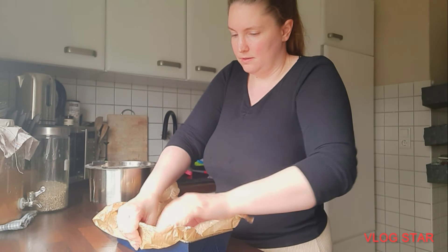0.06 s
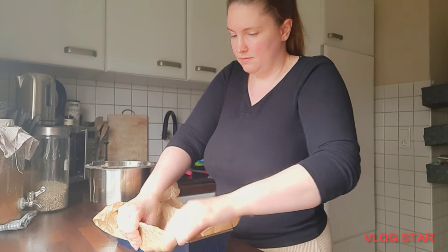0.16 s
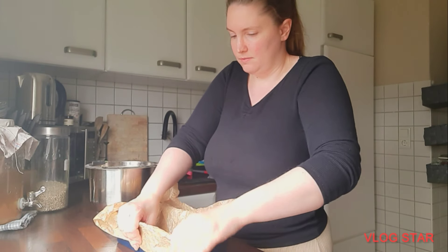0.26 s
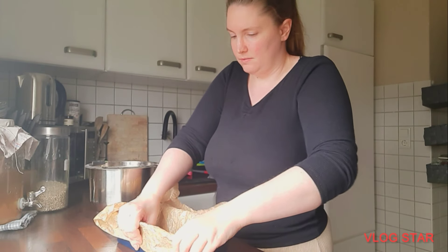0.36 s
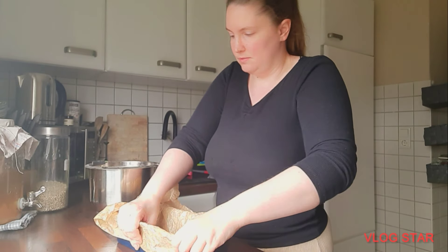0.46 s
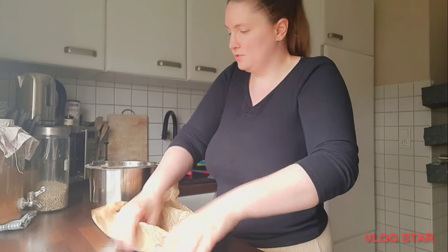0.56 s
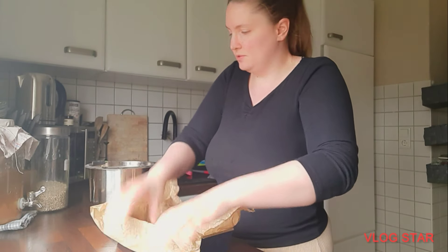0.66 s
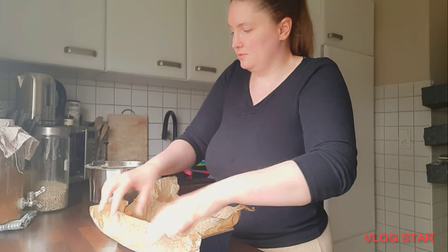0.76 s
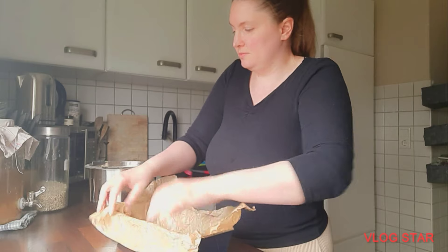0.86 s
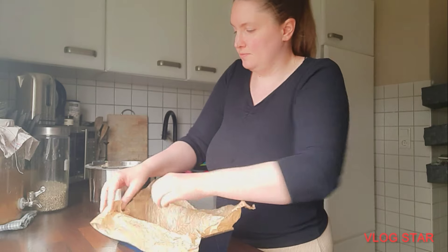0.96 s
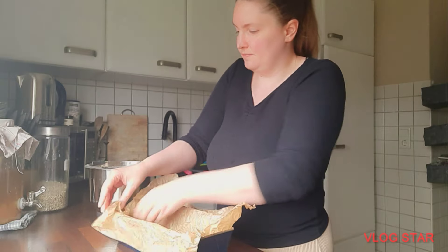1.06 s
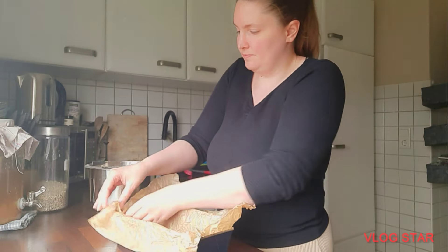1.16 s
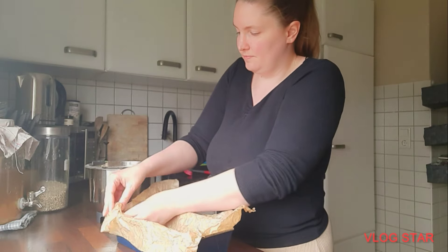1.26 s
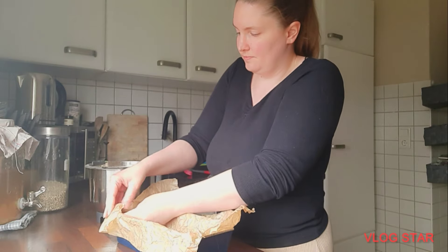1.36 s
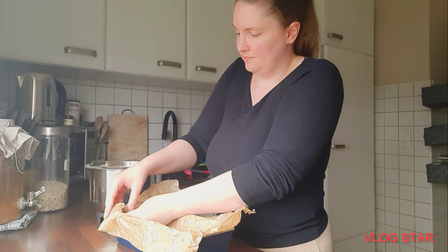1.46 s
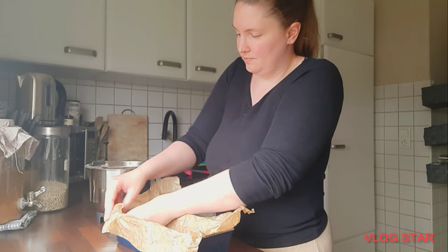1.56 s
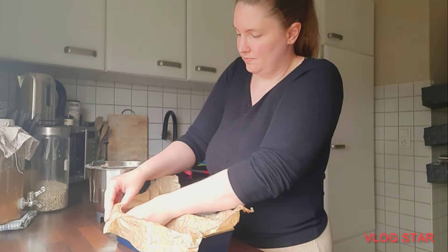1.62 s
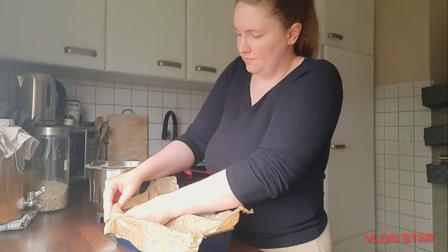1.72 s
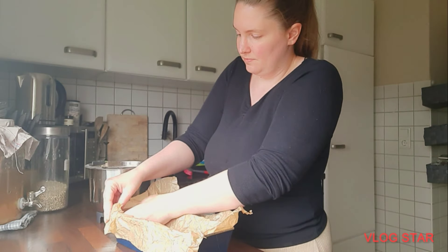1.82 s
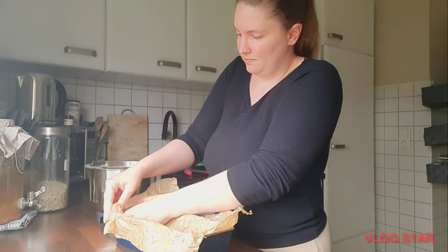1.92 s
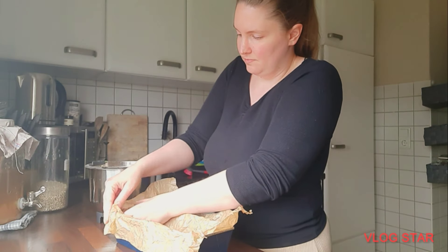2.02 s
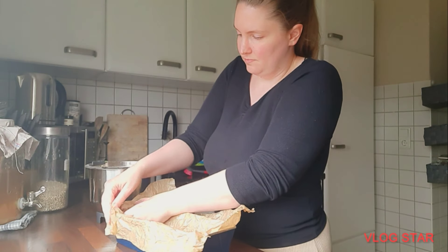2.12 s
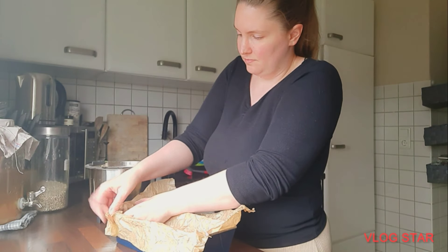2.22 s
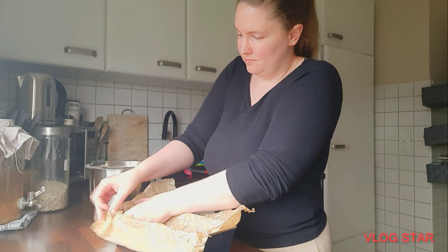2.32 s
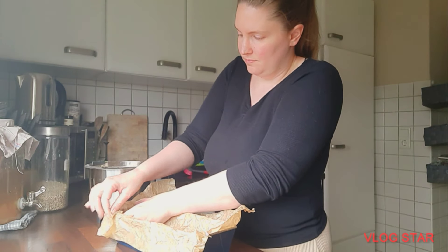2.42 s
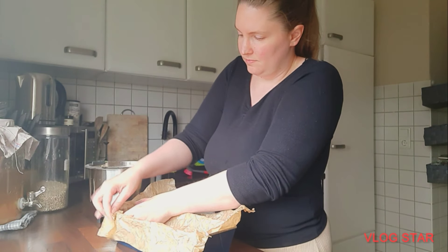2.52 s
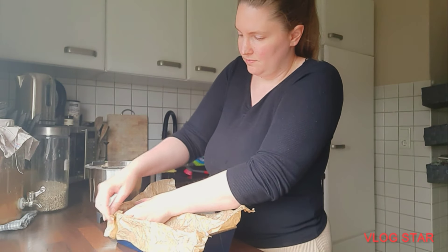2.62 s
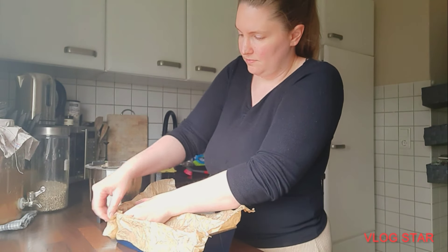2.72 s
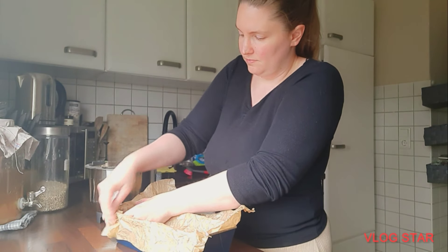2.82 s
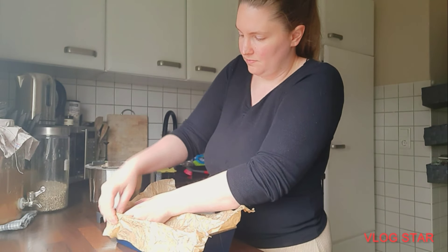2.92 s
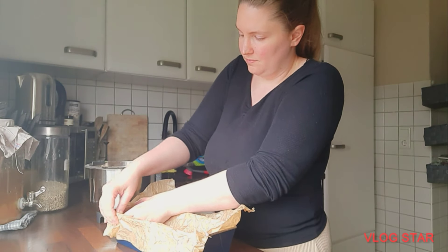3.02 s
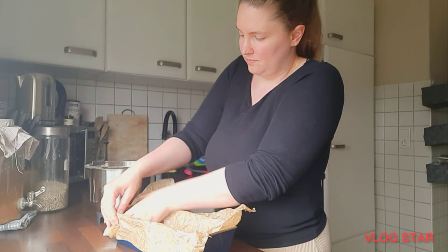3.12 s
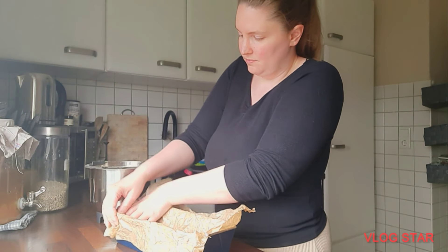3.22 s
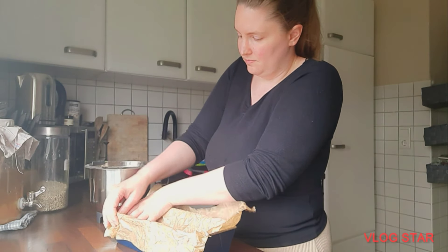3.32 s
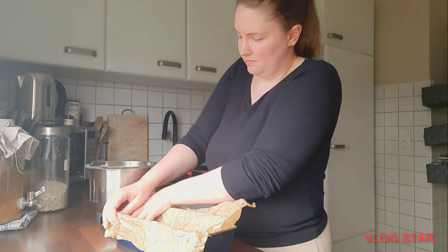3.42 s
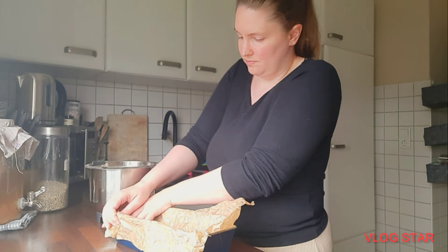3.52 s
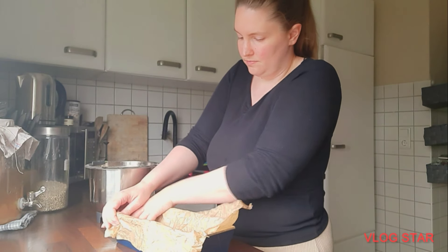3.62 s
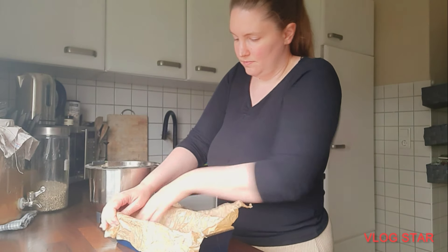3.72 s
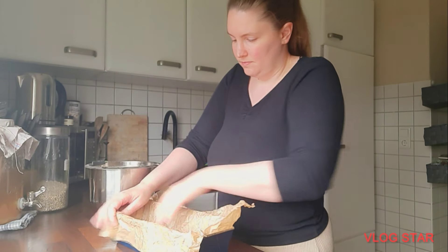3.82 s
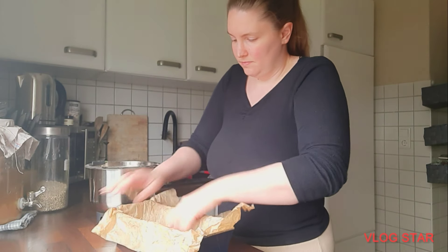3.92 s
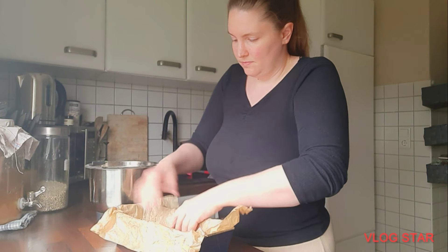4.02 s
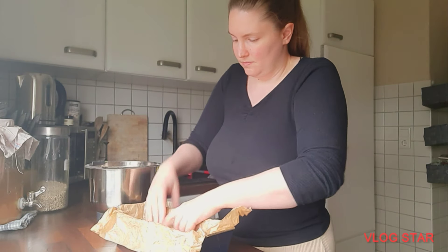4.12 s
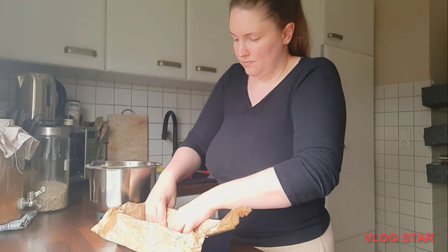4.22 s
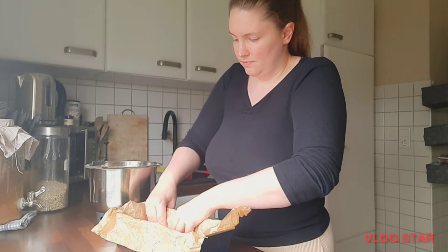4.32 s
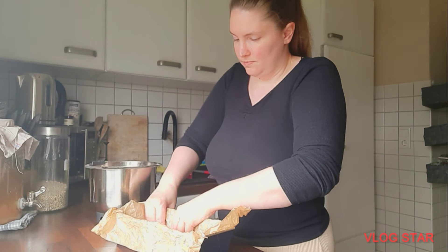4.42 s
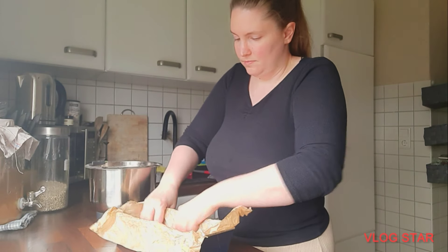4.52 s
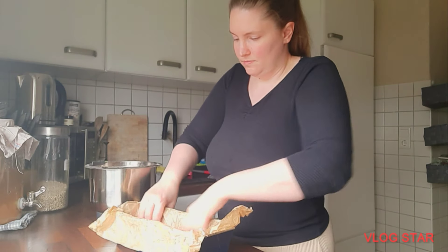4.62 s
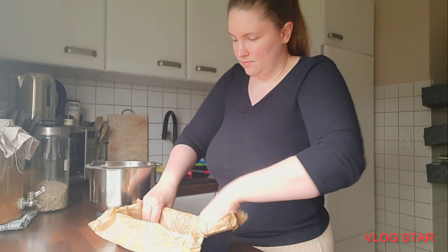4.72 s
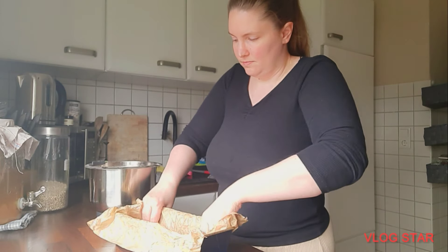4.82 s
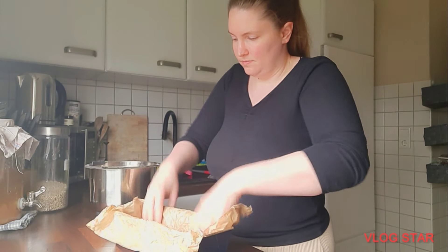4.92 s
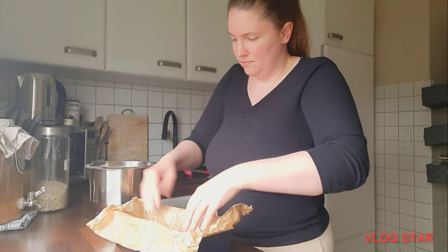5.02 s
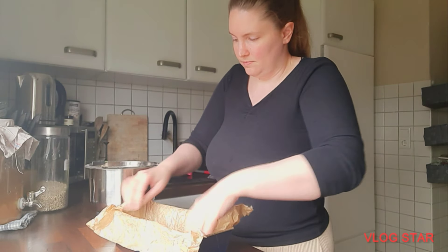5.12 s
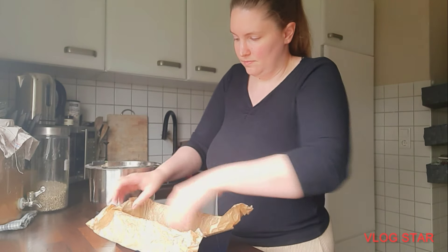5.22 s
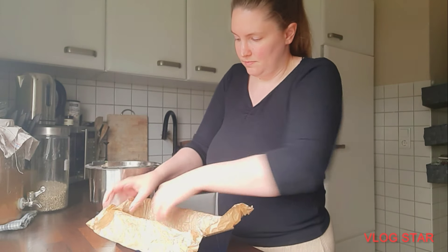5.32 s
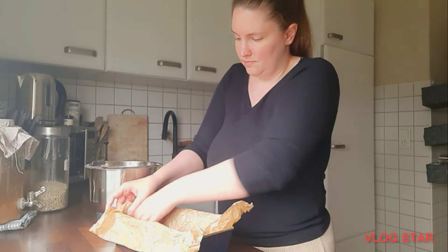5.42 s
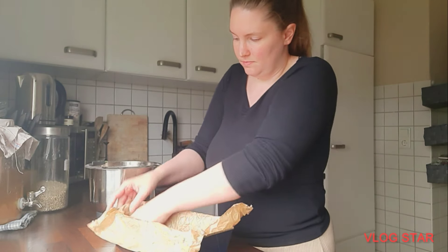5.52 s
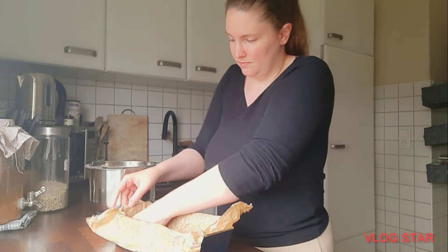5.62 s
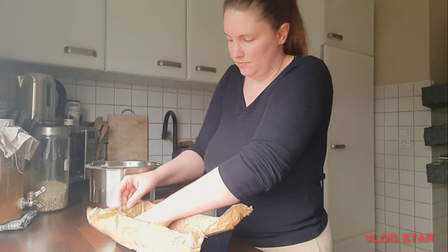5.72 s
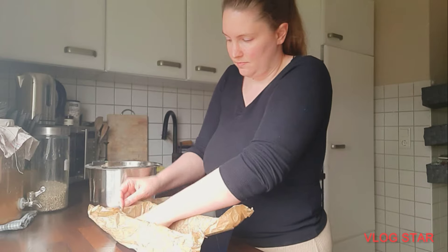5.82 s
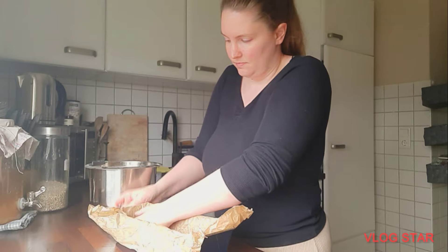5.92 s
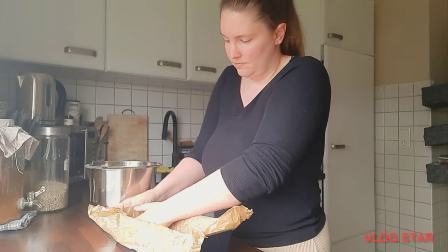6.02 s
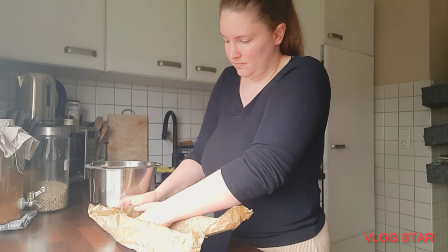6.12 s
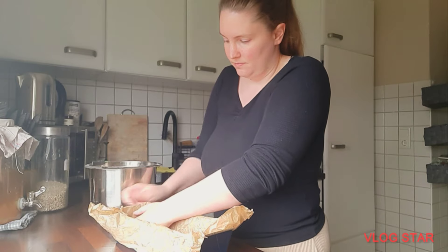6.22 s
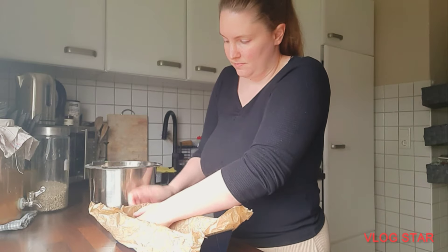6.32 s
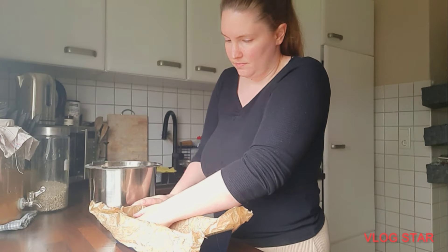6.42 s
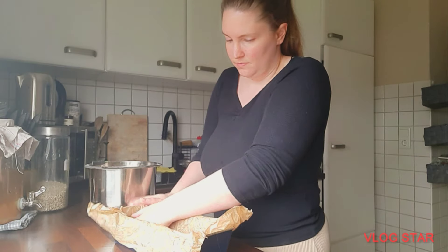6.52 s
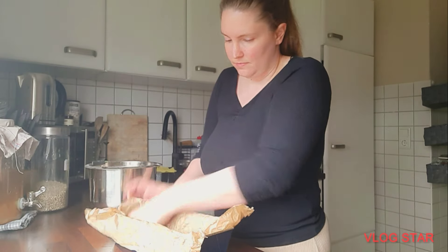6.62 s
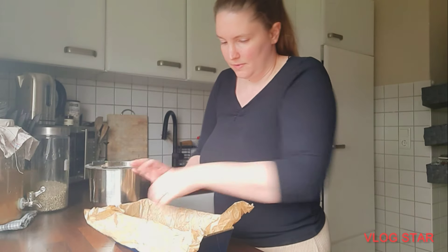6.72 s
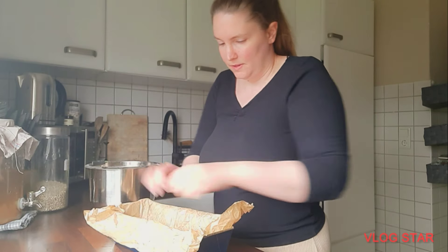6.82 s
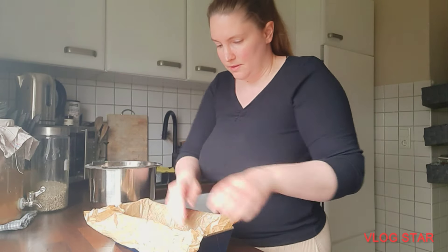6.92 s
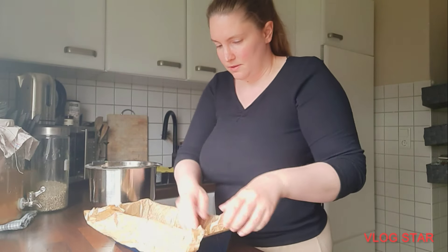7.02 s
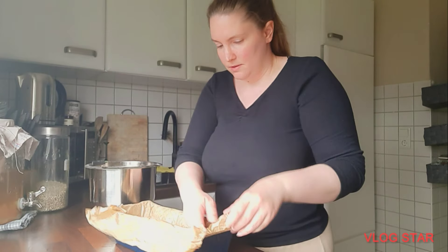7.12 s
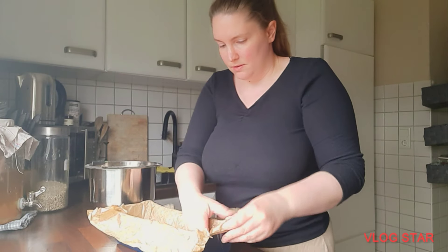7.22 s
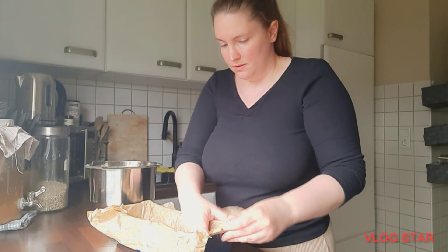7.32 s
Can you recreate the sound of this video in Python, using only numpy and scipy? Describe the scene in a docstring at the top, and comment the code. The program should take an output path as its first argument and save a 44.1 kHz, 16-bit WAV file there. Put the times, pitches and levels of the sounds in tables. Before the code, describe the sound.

Hands push and fold stiff baking paper into a loaf tin on a kitchen counter. Short bursts of bright crinkling come in uneven strokes, with sharp creases snapping, hollow panel pops and dull tin bumps. The strongest crunch comes past the middle, then shorter strokes follow to the end. Close stereo microphone, slightly stronger to the right, small tiled room echo, faint air and low hum.

```python
"""Faint air and a low hum come first, with the light rustle of hands already resting on baking paper.
Two hands press the sheet into a loaf tin on a kitchen counter, close to a two-port microphone.
Strokes are swarms of tiny noise bursts: flexing, rubbing and crinkling; creases snap and panels pop.
Fingers drag along the tin and bump it, stirring its resonances; a small tiled kitchen echoes the paper and tin."""
import sys
import numpy as np
from scipy import signal
from scipy.fft import rfft, irfft, next_fast_len
from scipy.io import wavfile
from scipy.ndimage import map_coordinates

SR = 44100
rng = np.random.default_rng(int(sys.argv[2]) if len(sys.argv) > 2 else 0)


def put_to_file(sound):
    """Save the sound as 16-bit audio at rate SR, in the file named by the first command-line argument."""
    columns = np.atleast_2d(sound).T  # one column per channel
    safe = np.clip(columns, -1, 1)
    whole_steps = np.round(safe * 32767)
    wavfile.write(sys.argv[1], SR, whole_steps.astype(np.int16))


N = 324576  # length in samples
TOP_HZ = 15950  # band limit of the microphone


def amp(db):
    """Amplitude factor of a level in dB."""
    return 10 ** (np.asarray(db) / 20)


def unit(x):
    """Scale a signal to rms 1."""
    return x / np.sqrt(np.mean(x ** 2) + 1e-20)


def along(points, hz):
    """Read a (f/Hz, value) table at any frequency, on a log axis."""
    f, value = np.transpose(points)
    return np.interp(np.log(hz + 1), np.log(f + 1), value)


def wobble(rate):
    """A smooth random curve with rate knots a second."""
    knots = rng.standard_normal(int(N * rate / SR) + 4)
    return map_coordinates(knots, [np.arange(N) * rate / SR])


def add(track, s, sound):
    """Mix a sound into a track at time s."""
    start = max(round(s * SR), 0)
    part = track[..., start:start + sound.shape[-1]]
    part += sound[..., :part.shape[-1]]


def filtered(x, response):
    """Multiply the spectrum of x by a complex response of frequency."""
    n = x.shape[-1]
    padded = 2 * next_fast_len(n * 5 // 8)
    spectrum = rfft(x, padded) * response(np.fft.rfftfreq(padded, 1 / SR))
    return irfft(spectrum, padded)[..., :n]


def coloured(x, points):
    """Causal (minimum-phase) filter with the gains of a (f/Hz, level/dB) table."""
    def response(hz):
        cepstrum = irfft(np.log(amp(along(points, hz))))
        # folding the cepstrum onto positive time makes the filter causal
        cepstrum[1:len(hz) - 1] *= 2
        cepstrum[len(hz):] = 0
        return np.exp(rfft(cepstrum))
    return filtered(x, response)


def resonance(f, centre, width):
    """Response of one damped mode."""
    return 1j * f * width / (centre ** 2 - f * f + 1j * f * width)


# How alike the two microphone ports hear a spread source: f/Hz, likeness (0 to 1)
PORT_LIKENESS = [(100, 0.91), (250, 0.92), (500, 0.56), (1000, 0.23), (4000, 0.26), (12000, 0.05)]


def spread(pair):
    """Two unrelated signals become left and right, alike in the bass and wide in the treble."""
    def mid_side_gains(hz):
        turn = np.arccos(np.clip(along(PORT_LIKENESS, hz), -1, 1)) / 2
        return np.array([np.cos(turn), np.sin(turn)])
    mid, side = filtered(pair, mid_side_gains)
    return np.array([mid + side, mid - side])


# Spectrum of the still kitchen air: f/Hz, relative level/dB
AIR_COLOUR = [(20, -30), (50, -9.5), (100, -4.5), (400, -15.5), (1000, -27), (4000, -21.5), (15000, -28)]
HUM_HZ = 69.7


def background():
    """Still air is coloured noise; a low appliance hum is a sine with a slowly wandering phase."""
    air = unit(coloured(spread(rng.standard_normal((2, N))), AIR_COLOUR))
    hum_phase = 2 * np.pi * HUM_HZ * np.arange(N) / SR + 0.5 * wobble(3.5)
    return amp(-67.5) * air + amp(-75.0) * np.sin(hum_phase)


RELEASE_DB_PER_S = 174  # the paper settles once the fingers stop
CREST = 0.64  # share of a movement's length at which its arch turns


def gesture(start, length, attack_s, swell_db):
    """Gain of one hand movement: the grip, an arch of pressure in dB, then a steady fall."""
    t = np.arange(N) / SR - start
    grip = np.clip(t / attack_s, 0, 1)
    progress = np.clip(t / length, 0, 1)
    arch_db = -swell_db * (1 - progress / CREST) ** 2
    fall_db = RELEASE_DB_PER_S * np.maximum(t - length, 0)
    return grip * amp(arch_db - fall_db)


# Hands resting and shifting on the sheet: start t/s, length/s, relative level/dB
RESTING_HANDS = [(-0.04, 0.76, -53), (0.82, 1.9, -50), (2.54, 0.093, -54.5), (2.82, 0.59, -49),
                 (3.124, 1.92, -48.5), (5.404, 1.24, -46), (7.034, 0.26, -49)]
# Pushes, folds and tucks: start t/s, length/s, then relative level/dB of flexing, rubbing, crinkling
HAND_STROKES = [(0.048, 0.16, -49.5, -47, -41.5), (0.173, 0.25, -43.5, -38.5, -33.5),
                (0.579, 0.064, -46.5, -40.5, -42.5), (0.823, 0.036, -50, -38, -37),
                (0.857, 0.13, -45, -47.5, -59), (1.194, 0.22, -45, -43.5, -37),
                (1.536, 0.16, -38, -38.5, -36), (1.782, 0.09, -39, -41, -35),
                (1.863, 0.1, -39.5, -37.5, -33), (2.034, 0.19, -47, -41.5, -38.5),
                (2.315, 0.03, -43.5, -50, -35), (2.367, 0.036, -46.5, -40.5, -34.5),
                (2.546, 0.11, -65, -43.5, -44.5), (2.733, 0.05, -64, -47.5, -37.5),
                (2.785, 0.066, -56, -42.5, -38.5), (2.968, 0.048, -43, -39, -34),
                (3.207, 0.11, -43, -40.5, -37.5), (3.303, 0.38, -52, -42.5, -39.5),
                (3.636, 0.057, -42.5, -40, -43), (4.005, 0.14, -53, -44, -47.5),
                (4.175, 0.22, -42, -35.5, -33.5), (4.455, 0.16, -42, -38.5, -37),
                (4.68, 0.13, -34.5, -29.5, -26.5), (4.901, 0.085, -45.5, -39, -35.5),
                (5.127, 0.092, -42.5, -39, -38), (5.386, 0.043, -56, -51.5, -52),
                (5.494, 0.11, -42.5, -37.5, -37), (5.683, 0.072, -43, -38, -35),
                (5.899, 0.083, -40, -37, -34), (6.315, 0.053, -54, -40.5, -51),
                (6.36, 0.12, -41, -38, -34.5), (6.569, 0.14, -44, -41, -39), (7.081, 0.28, -44, -35.5, -36)]
STROKE_ATTACK_S, STROKE_SWELL_DB = 0.0046, 11  # the fingers take hold fast, then press harder
TOUCH_ATTACK_S = 0.034  # resting hands land gently
TOUCH_FLEX_DB, TOUCH_RUB_DB = -7, -2  # against the crinkling of a resting hand


def handling():
    """Strengths of flexing, rubbing and crinkling: strokes and resting hands, added in power."""
    power = np.zeros((3, N))
    for s, length, *levels_db in HAND_STROKES:
        stroke = gesture(s, length, STROKE_ATTACK_S, STROKE_SWELL_DB)
        power += np.outer(amp(levels_db), stroke) ** 2
    for s, length, db in RESTING_HANDS:
        levels_db = [db + TOUCH_FLEX_DB, db + TOUCH_RUB_DB, db]
        power += np.outer(amp(levels_db), gesture(s, length, TOUCH_ATTACK_S, 0)) ** 2
    return np.sqrt(power)


def patches(pair, patchy_db):
    """Every fold rings at its own pitches, so the colour keeps changing."""
    z = signal.stft(pair, nperseg=512)[2]
    blur = np.outer(np.hanning(8), np.hanning(9))  # over frequency and time
    field = signal.convolve2d(rng.standard_normal(z.shape[1:]), blur, "same")
    return signal.istft(z * amp(patchy_db * unit(field)), nperseg=512)[1][:, :N]


def swarm(colour, rate, t60, scatter_db, clump_db, patchy_db):
    """Facets buckle at random, in small avalanches, each a short dying noise burst; rms 1."""
    scatter = scatter_db * np.clip(rng.standard_normal(N), -2, 2)
    size = amp(scatter + clump_db * wobble(50))
    flips = (rng.random(N) < rate / SR) * size
    decay = amp(-60 / (t60 * SR)) ** 2  # energy kept from sample to sample
    energy = signal.lfilter([1], [1, -decay], flips ** 2)
    bursts = np.sqrt(energy) * patches(rng.standard_normal((2, N)), patchy_db)
    return unit(coloured(spread(bursts), colour))


# Spectrum of fine wrinkles: f/Hz, relative level/dB
CRINKLE_COLOUR = [(1000, -44.5), (3000, -5), (5000, -3.5), (7000, -2.5), (8700, -3), (9900, -7),
                  (11200, -3), (13200, -4), (15800, -9.5)]


def crackles(rate=200, centre_hz=5800, pitch_spread=0.47, loss_db=5.0, scatter_db=5.0, wander_s=0.0001457):
    """Single wrinkles flip, each a tick at its own pitch and place that loses loss_db a cycle; rms 1."""
    t = np.arange(SR // 200) / SR
    starts = np.flatnonzero(rng.random(N - len(t)) < rate / SR)
    traits = rng.standard_normal((N, 4))[starts].T.clip(-2, 2)
    pitch, size, place, lean = traits[:, :, None]
    hz = np.minimum(centre_hz * np.exp(pitch_spread * pitch), TOP_HZ)
    samples = (starts[:, None] + np.arange(len(t))).ravel()
    out = []
    for side in 1, -1:  # left, right
        arrival_s = wander_s * (2 + side * place)
        cycles = hz * np.maximum(t - arrival_s, 0)
        level_db = scatter_db * size + 2 * side * lean - loss_db * cycles
        ticks = amp(level_db) * np.sin(2 * np.pi * cycles)
        out.append(np.bincount(samples, ticks.ravel(), N))
    return unit(coloured(np.array(out), CRINKLE_COLOUR))


# Spectrum of wide flexing panels: f/Hz, relative level/dB
FLEX_COLOUR = [(150, -23.5), (330, -7), (510, -3.5), (760, -0.5), (960, 3.5), (1200, -7), (2000, -20.5),
               (5000, -47)]
# Spectrum of skin rubbing the sheet: f/Hz, relative level/dB
RUB_COLOUR = [(400, -31), (900, -8), (1400, 1), (2150, 0.5), (2700, -1), (4000, -4), (6000, -7),
              (14000, -43)]


def sheet():
    """Wide panels flex low, skin rubs in the middle, and fine wrinkles crackle on top."""
    flexing, rubbing, crinkling = handling()
    flex = swarm(FLEX_COLOUR, rate=500, t60=0.026, scatter_db=2.5, clump_db=2.5, patchy_db=2.0)
    rub = swarm(RUB_COLOUR, rate=400, t60=0.031, scatter_db=2.5, clump_db=1.1, patchy_db=2.0)
    fizz = swarm(CRINKLE_COLOUR, rate=2200, t60=0.015, scatter_db=2.0, clump_db=2.5, patchy_db=2.0)
    crinkle = amp(-2.0) * fizz + amp(-8.5) * crackles()
    return flexing * amp(-1.0) * flex + rubbing * amp(-0.3) * rub + crinkling * crinkle


# Reverberation of the small tiled kitchen: f/Hz, t60/s
KITCHEN_T60 = [(100, 0.58), (500, 0.49), (2000, 0.49), (6000, 0.44), (15000, 0.21)]


def kitchen(x):
    """Tiles and cupboards answer, the treble dying first; the moving arms keep changing the echo paths."""
    out = np.zeros((2, N))
    step = SR // 4  # each quarter second gets a fresh noise tail
    for start in range(0, N, step):
        hz, t, z = signal.stft(rng.standard_normal((2, SR // 2)), SR, nperseg=256)
        decay = amp(-60 * t / along(KITCHEN_T60, hz)[:, None])
        tail = spread(signal.istft(z * decay, SR, nperseg=256)[1])
        tail = tail / np.linalg.norm(tail[0])
        echo = signal.fftconvolve(x[:, start:start + step], tail, axes=1)
        add(out, start / SR + .004, echo)  # first echo after 4 ms
    return out


def buckle(hz, t60, attack, breadth):
    """Paper flips over: a dying burst around its own pitch, different in each direction; rms 1 over 60 ms."""
    t = np.arange(SR // 16) / SR
    burst = rng.standard_normal((2, len(t))) * amp(-60 * t / t60) * (1 - np.exp(-t / attack))
    return unit(spread(filtered(burst, lambda f: resonance(f, hz, hz * breadth) ** 2)))


# Creases snapping through: t/s, relative level/dB, f/Hz
CREASE_SNAPS = [(0.072, -38, 7100), (0.170, -36, 9500), (0.231, -33.5, 4500), (0.251, -31.5, 8000),
                (0.338, -33, 8500), (0.380, -23, 5330), (0.3848, -31, 6500), (0.499, -36, 8000),
                (0.8302, -30, 9200), (1.129, -38, 13000), (1.263, -29.5, 9800), (1.304, -34.5, 3500),
                (1.332, -34, 7500), (1.641, -29.5, 5050), (1.6773, -30, 7500), (1.9105, -35, 6000),
                (2.060, -33, 7100), (2.094, -40, 4000), (2.1087, -30.5, 4160), (2.116, -37, 12000),
                (2.199, -32, 9140), (2.236, -35.5, 5600), (2.3373, -35.5, 3500), (2.3485, -35, 3000),
                (2.3731, -26.5, 7500), (2.4005, -30.5, 9000), (2.5406, -30.5, 7900), (2.5439, -34, 8200),
                (2.5752, -34, 7600), (2.5957, -32, 8900), (2.6046, -24.5, 9700), (2.656, -36, 8700),
                (2.676, -35, 7800), (2.7012, -32, 6200), (2.7422, -29, 8500), (2.7574, -32, 5700),
                (2.8747, -25, 9500), (2.8764, -28.5, 8500), (2.988, -32, 11000), (2.9955, -26, 12800),
                (3.0048, -33.5, 3620), (3.229, -32, 5500), (3.264, -40, 8900), (3.3866, -26.5, 5200),
                (3.467, -32.5, 5200), (3.5148, -30, 5800), (3.522, -28.5, 8700), (3.556, -29, 6700),
                (4.017, -40, 9000), (4.080, -34.5, 5900), (4.2913, -36, 9100), (4.417, -30, 8800),
                (4.7075, -29, 10400), (4.818, -41, 8000), (4.864, -30.5, 5260), (5.1582, -31.5, 6400),
                (5.417, -38, 6000), (5.921, -26.5, 11000), (5.925, -33, 7000), (5.9448, -30, 4700),
                (6.097, -37, 4700), (6.3528, -28.5, 8900), (6.5343, -34.5, 5400), (7.2882, -31, 6000),
                (7.296, -27.5, 4930)]
# Colour laid over all snaps: f/Hz, gain/dB
SNAP_COLOUR = [(150, -9), (700, -5), (2000, 7.5), (5000, 3), (8800, 2.5), (9900, -1.5), (11200, 5),
               (15800, 2.5)]
SNAP_T60_S = .011  # for a facet at 8000 Hz
FOLLOW_S, FOLLOW_DB = .003, -8  # a snap tips a neighbouring facet over: typical delay, level
SNAP_PAN_DB = -1.5  # left minus right: the creases face the right port
SNAP_ALIKE = 0.21  # the share that both ports hear alike


def snaps(stiffness=0.19):
    """Creases snap through, each with a weaker follower; large facets ring lower and longer than small ones."""
    out = np.zeros((2, N))
    for s, db, hz in CREASE_SNAPS:
        t60 = SNAP_T60_S * (8000 / hz) ** stiffness
        delay = FOLLOW_S * np.exp(.5 * rng.standard_normal())
        for when, level in (s, db), (s + delay, db + FOLLOW_DB):
            add(out, when, amp(level - 15.5) * buckle(hz, t60, attack=0.00047, breadth=1.42))
    turn = np.arcsin(np.clip(SNAP_ALIKE, 0, 1)) / 2
    out = np.cos(turn) * out + np.sin(turn) * out[::-1]  # each port hears some of the other side
    return coloured(out, SNAP_COLOUR) * amp([[SNAP_PAN_DB / 2], [-SNAP_PAN_DB / 2]])


# Modes of the tin on the counter: f/Hz, width/Hz, relative level/dB
TIN_MODES = [(67.5, 10, -11), (111, 28, -3), (143.7, 27, 0), (197, 41, -2), (243, 18, -4.5),
             (273.3, 16.4, 1), (317, 26, -2), (354.8, 17, 1.5), (502.5, 13.4, 3.5), (609, 6.5, -8.5),
             (708, 5.8, 9)]


def tin_body(x):
    """The ring of the tin and the counter under it: damped modes of alternating sign."""
    def response(f):
        modes = enumerate(TIN_MODES)
        return sum((-1) ** k * amp(db) * resonance(f, hz, width) for k, (hz, width, db) in modes)
    return filtered(x, response)


# Fingers dragging along the tin: start t/s, length/s, level/dB
FINGER_DRAGS = [(0.077, 0.21, -54.5), (0.635, 0.4, -57), (1.154, 0.87, -55), (2.993, 0.3, -57.5),
                (3.895, 0.17, -55.5), (4.21, 0.17, -53.5), (4.628, 0.1, -47), (4.718, 0.092, -48),
                (4.907, 0.43, -56.5), (5.433, 0.42, -50.5), (6.655, 0.13, -52.5), (7.106, 0.16, -48.5)]
DRAG_ATTACK_S = 0.012  # the fingers lean in gradually
DRAG_SWELL_DB = -0.5  # negative: the pressure sags slightly towards the crest


def drags(skin_hz=240):
    """Fingers drag along the tin: uneven friction noise stirs its modes."""
    friction = spread(rng.standard_normal((2, N)) * amp(2.45 * wobble(25)))
    # soft skin hardly stirs the high modes
    friction = filtered(friction, lambda f: resonance(f, skin_hz, 2 * skin_hz))
    pressure = sum(amp(db) * gesture(s, length, DRAG_ATTACK_S, DRAG_SWELL_DB)
                   for s, length, db in FINGER_DRAGS)
    return pressure * unit(tin_body(friction))


# Whole panels of the sheet popping over: t/s, relative level/dB, f/Hz
PANEL_POPS = [(0.154, -39, 1800), (0.229, -35, 2490), (0.2802, -34, 1120), (1.355, -38, 2030),
              (1.625, -30.5, 880), (1.8565, -29.5, 2140), (1.888, -37, 2330), (1.945, -31.5, 850),
              (2.3365, -31.5, 1970), (2.348, -40, 2070), (2.393, -33.5, 2000), (2.756, -35, 2970),
              (2.8754, -42.5, 965), (3.004, -38, 2250), (3.3857, -35, 2250), (5.16, -35, 2670),
              (5.570, -32.5, 1580), (5.691, -31.5, 2280), (5.795, -33.5, 2110), (5.974, -29, 1420),
              (6.017, -34, 2080), (6.2616, -38.5, 2420), (6.334, -39.5, 2020), (6.352, -38, 1820),
              (6.411, -35, 2150), (6.433, -42, 3100), (6.445, -34.5, 510), (7.262, -30, 1000)]


def pops():
    """A wide panel gives way with a hollow, briefly pitched crunch."""
    out = np.zeros((2, N))
    for s, db, hz in PANEL_POPS:
        add(out, s, amp(db - 10.5) * buckle(hz, t60=0.018, attack=0.0005, breadth=0.28))
    return out


# Fingers bumping the tin: t/s, relative peak level/dB, f/Hz
FINGER_BUMPS = [(0.663, -34, 240), (0.85, -37, 352), (0.933, -32.5, 438), (1.299, -37, 337),
                (1.43, -28.5, 300), (1.9, -29.5, 424), (2.375, -34.5, 420), (3.001, -35.5, 302),
                (3.318, -39.5, 182), (4.223, -34, 282), (4.716, -23, 350), (4.775, -35, 350),
                (4.984, -49, 110), (5.021, -35.5, 270), (5.184, -39.5, 108), (5.234, -32, 272),
                (5.72, -35.5, 352), (6.436, -33.5, 394), (6.68, -36, 338)]


def bumps(push_t60=0.11, ring_db=-3, thud_db=-4):
    """Fingers bump the tin through the paper: a soft thud of dying noise, and the ring it stirs."""
    out = np.zeros((2, N))
    t = np.arange(SR // 3) / SR
    for s, db, hz in FINGER_BUMPS:
        push = spread(rng.standard_normal((2, len(t))) * amp(-60 * t / push_t60))
        thud = filtered(push, lambda f: resonance(f, 0.92 * hz, 0.91 * hz) ** 2 / (1 + 1j * f / (2 * hz)))
        ring = tin_body(thud)
        add(out, s, amp(db + ring_db) * ring / np.abs(ring).max())
        add(out, s, amp(db + thud_db) * thud / np.abs(thud).max())
    return out


def scene():
    """The tin stands a little off centre, so the right microphone port hears it earlier."""
    rustle = sheet()
    cracks = snaps() + pops()
    knocks = drags() + bumps()
    near = rustle + cracks + knocks
    room = kitchen(amp(-4.0) * rustle + amp(-3.5) * cracks + amp(-5.5) * knocks)
    lag = .00013  # s, left behind right
    near = filtered(near, lambda hz: np.exp(1j * np.pi * lag * np.array([-hz, hz])))
    return near + room + background()


# Sensitivity of the microphone ports, left minus right: f/Hz, level/dB
PORT_LEAN = [(100, -0.5), (280, -5), (600, -2), (1400, -3.5), (5000, -1.5), (9000, -3), (14000, -6.5)]


def record(dry):
    """The two ports differ in sensitivity; nothing is kept above the band limit."""
    def ports(hz):
        lean_db = along(PORT_LEAN, hz)
        return amp(np.array([lean_db, -lean_db]) / 2) * (hz < TOP_HZ)
    return filtered(dry, ports)


dry = scene()
out = record(dry)
put_to_file(out)
```